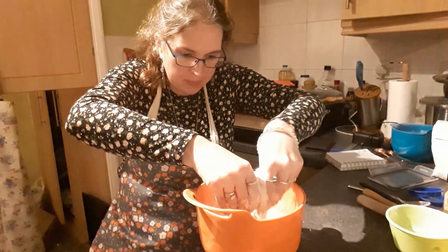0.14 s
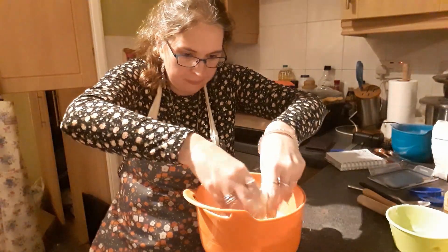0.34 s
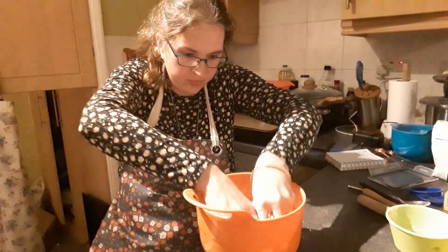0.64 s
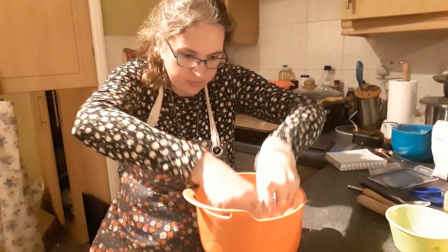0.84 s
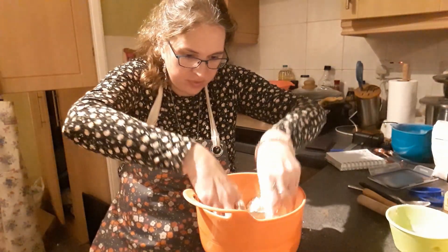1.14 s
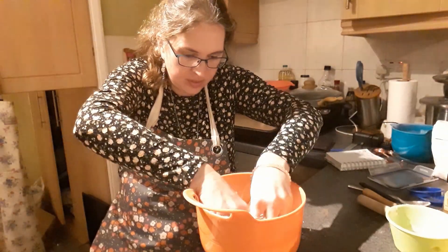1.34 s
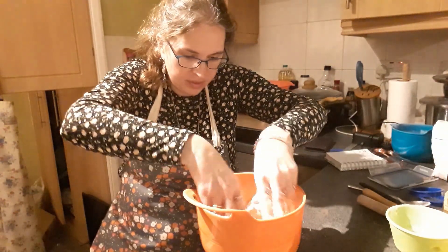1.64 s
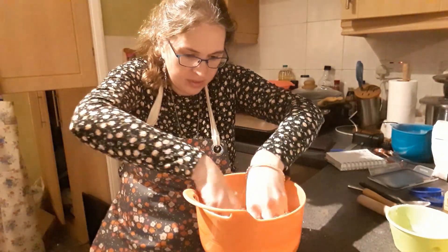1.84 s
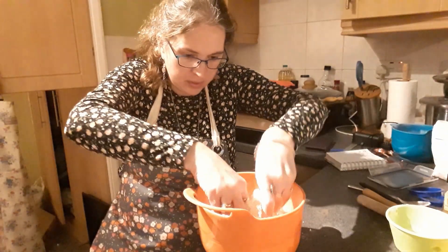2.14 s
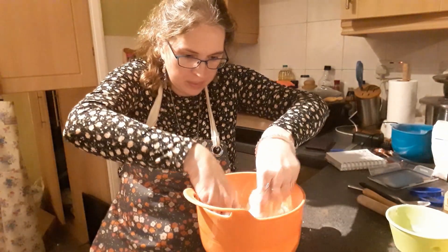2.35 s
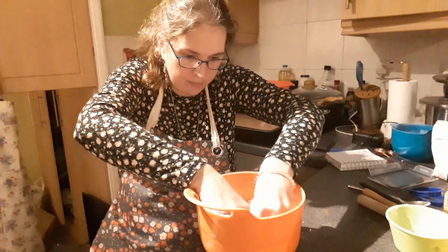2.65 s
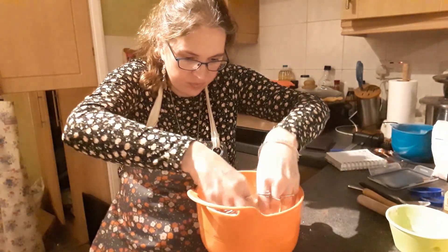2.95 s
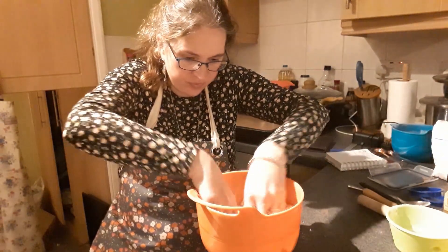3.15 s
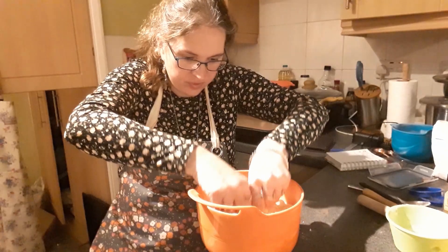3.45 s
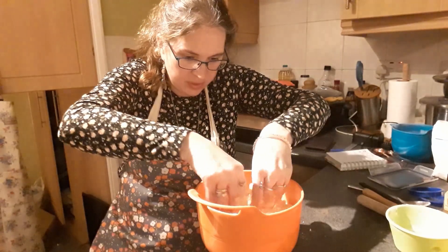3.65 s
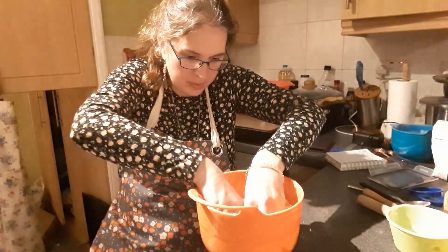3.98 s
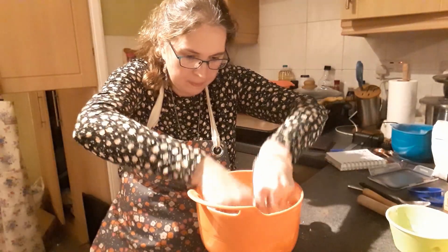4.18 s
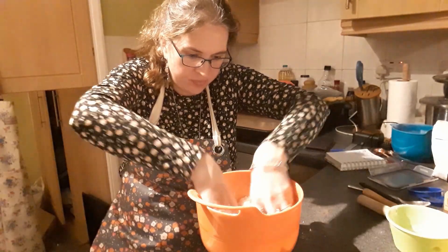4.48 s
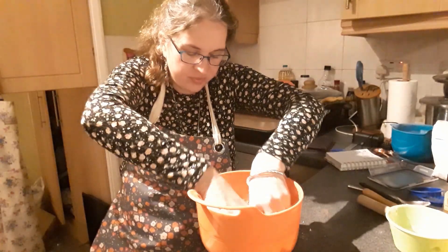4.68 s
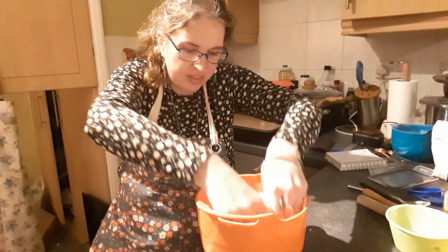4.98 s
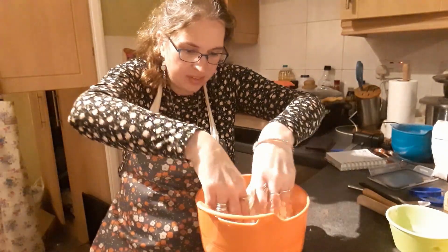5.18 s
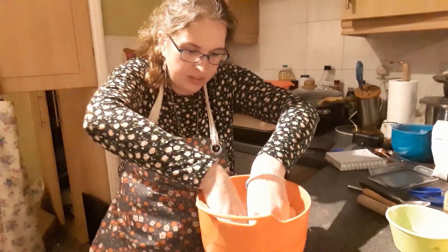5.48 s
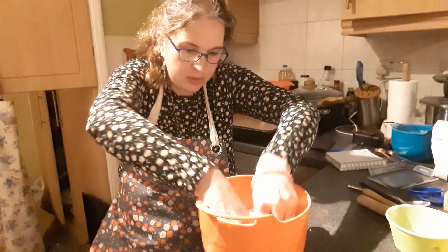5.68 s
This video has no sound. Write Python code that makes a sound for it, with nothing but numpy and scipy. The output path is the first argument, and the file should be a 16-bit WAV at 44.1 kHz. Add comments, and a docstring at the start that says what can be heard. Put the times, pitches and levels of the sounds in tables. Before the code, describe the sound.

Irregular clacks of ringed hands against a plastic mixing bowl punctuate soft floury rubbing and a steady appliance hum.

```python
"""Two hands rub butter into flour in a plastic mixing bowl, heard in mono from beside a kitchen worktop.
Flour hisses between the fingers, fingertips scrape the wall, and two thin squeaks come near the end.
Knuckles nudge the bowl, ringed hands knock on it and set it rocking, and the rings tick lightly.
The small hard room answers every knock; behind it all an appliance hums at twice the mains rate."""
import sys
import numpy as np
from scipy import signal
from scipy.fft import rfft, irfft
from scipy.io import wavfile

SR = 44100
rng = np.random.default_rng(int(sys.argv[2]) if len(sys.argv) > 2 else 0)


def dump_mix(stems):
    """Bounce the given channels to the path in sys.argv[1] as a 16-bit WAV at rate SR."""
    frames = np.atleast_2d(stems).T  # one column per channel
    limited = np.clip(frames, -1, 1)  # hard clip at full scale
    pcm = np.round(limited * 32767).astype(np.int16)
    wavfile.write(sys.argv[1], SR, pcm)


N = 256662
TIME = np.arange(N) / SR


def from_db(db):
    """Decibels to gain."""
    return 10 ** (np.asarray(db) / 20)


def rms_one(x):
    """Scale to rms 1."""
    return x / np.sqrt(np.mean(x ** 2) + 1e-30)


def unit_energy(x):
    """Scale a response so that it passes white noise at unchanged level."""
    return x / np.sqrt(np.sum(x ** 2) + 1e-30)


def at_hz(points, hz):
    """Read a curve on a log-frequency axis."""
    points = np.array(points)
    return np.interp(np.log(np.maximum(hz, 1)), np.log(points[:, 0]), points[:, 1])


def through(x, response):
    """Pass a signal through an impulse response."""
    return signal.fftconvolve(x, response)[:len(x)]


def resonance(x, hz, q):
    """The part of a signal that one resonance passes."""
    return signal.lfilter(*signal.iirpeak(hz, q, fs=SR), x)


def pulse(spectrum, size=4096):
    """The shortest causal pulse with this spectral shape, given as (Hz, dB) points."""
    gains = from_db(at_hz(spectrum, np.arange(size // 2 + 1) * SR / size))
    cepstrum = irfft(np.log(gains))
    cepstrum[1:size // 2] *= 2   # fold to minimum phase
    cepstrum[size // 2 + 1:] = 0
    return unit_energy(irfft(np.exp(rfft(cepstrum))))


def ringing(modes):
    """Decaying sines of alternating sign; dB sets each one's share of the energy."""
    t = TIME[:SR // 2]
    out = np.zeros(len(t))
    for k, (hz, db, t60) in enumerate(modes):
        mode = np.sin(2 * np.pi * hz * t) * np.exp(-np.log(1000) * t / t60)
        out += (-1) ** k * from_db(db) * unit_energy(mode)
    return unit_energy(out)


def drift(per_s):
    """A random wander of rms 1 that turns per_s times a second."""
    knots = rng.standard_normal(4096)
    return rms_one(np.interp(TIME * per_s, np.arange(len(knots)), knots))


def add(out, start_s, x):
    """Mix a sound in at its start time."""
    at = max(round(start_s * SR), 0)
    out[at:at + len(x)] += x[:max(N - at, 0)]


# The rush of the room all round the microphone. Each row: frequency in Hz, relative level in dB.
AIR_SPECTRUM = [(20, -20.5), (60, -2.5), (130, -4.5), (165, 2.5), (235, -5), (330, -7.5), (400, -13.5),
                (520, -10), (800, -18.5), (1400, -31), (5000, -42), (7500, -24), (9000, -38.5),
                (16000, -30.5)]
# The hum in the background. Each row: multiple of the hum rate, rms level in dB.
HUM_PARTIALS = [(1, -49.5), (2, -71), (3, -69)]
# The whirr that goes with it. Each row: centre in Hz, width in Hz, rms level in dB.
WHIRR_BANDS = [(228.2, 7.8, -70), (2820, 170, -83)]

def appliance(hum_hz, air_db):
    """Mains hum, a narrow whirr and the soft rush of the room."""
    out = from_db(air_db) * through(rng.standard_normal(N), pulse(AIR_SPECTRUM))
    for multiple, db in HUM_PARTIALS:
        amplitude = np.sqrt(2) * from_db(db + 0.054 * multiple * drift(5.1))
        out += amplitude * np.sin(2 * np.pi * (multiple * hum_hz * TIME + rng.random()))
    for hz, width, db in WHIRR_BANDS:
        out += from_db(db) * rms_one(resonance(rng.standard_normal(N), hz, hz / width))
    return out


# The small hard kitchen, heard from the worktop. Each row: frequency in Hz, 60 dB decay in seconds.
ROOM_DECAY = [(150, 0.51), (500, 0.27), (2500, 0.29), (7000, 0.26), (14000, 0.37)]

def kitchen(x, wet_db, first_s=0.003, build_s=0.00044):
    """Direct sound reaches the microphone, then reflections thicken fast and die octave by octave."""
    t = TIME[:SR // 2]
    build = 1 - np.exp(-np.maximum(t - first_s, 0) / build_s)
    scatter = rfft(rng.standard_normal(len(t)) * build)
    octaves = 125 * 2 ** np.arange(8)
    bin_hz = np.arange(1, len(scatter) + 1) * SR / len(t)
    nearest = np.argmin(abs(np.log(bin_hz / octaves[:, None])), axis=0)
    tail = np.zeros(len(t))
    for k, hz in enumerate(octaves):
        decay = np.exp(-np.log(1000) * t / at_hz(ROOM_DECAY, hz))
        tail += irfft(scatter * (nearest == k), len(t)) * decay
    wet = from_db(wet_db)
    return (x + wet * through(x, unit_energy(tail))) / np.sqrt(1 + wet ** 2)


# The worktop under the bowl. Each row: mode in Hz, relative level in dB, 60 dB decay in seconds.
WORKTOP_MODES = [(75, -11, .06), (163.6, 11, 0.25), (230, -9, 0.058)]
# The dull crunch inside the bowl. Each row: frequency in Hz, relative level in dB.
CRUNCH_SPECTRUM = [(80, -21), (300, -19), (430, 19.5), (560, 19.5), (750, 12), (1100, -17), (1700, -12),
                   (3000, 9), (8000, -48), (16000, -18.5)]
# Knuckles push through the flour. Each row: start in seconds, crunch and thump in relative dB.
KNUCKLE_PUSHES = [(0.872, -72, -66), (1.370, -67.5, -74), (1.952, -63, -59.5), (2.535, -61, -69.5),
                  (2.701, -63.5, -60.5), (4.154, -71, -52), (4.471, -45.5, -46.5), (4.668, -72, -55),
                  (4.800, -62, -64)]

def nudges(rise_s, fall_s, level_db, thump_db):
    """Cushioned pushes: a dull crunch in the bowl and a thump in the worktop."""
    out, t, worktop = np.zeros(N), TIME[:SR // 4], ringing(WORKTOP_MODES)
    for start_s, db, weight_db in KNUCKLE_PUSHES:
        push = rng.standard_normal(len(t)) * (1 - np.exp(-t / rise_s)) * np.exp(-t / fall_s)
        add(out, start_s, from_db(db + level_db) * through(push, pulse(CRUNCH_SPECTRUM)))
        add(out, start_s, from_db(weight_db + thump_db) * worktop)
    return out


def contact(spread_s, smear):
    """Bending waves run round the wall and stretch a touch into a short packet without colouring it."""
    omega = 2 * np.pi * np.arange(1025) / 2048
    spectrum = np.ones(len(omega), complex)
    for share in rng.uniform(.85, 1.15, 5) / 1.6 ** np.arange(5):
        lag = np.exp(-1j * omega * np.ceil(share * spread_s * SR))
        spectrum *= (lag - smear) / (1 - smear * lag)   # all-pass
    return irfft(spectrum)


# A metal ring on the hand. Each row: mode in Hz, relative level in dB, 60 dB decay in seconds.
RING_MODES = [(5000, -3, 0.02), (7510, 5.5, 0.022), (7600, 3.5, 0.012), (11100, -6, 0.0069),
              (13300, 0.5, 0.0067), (13400, -3, 0.0054), (15000, -3, 0.0036)]

def finger_ring(detune=0.018, vary_db=4):
    """The finger inside a ring shifts and weighs its modes anew at each touch."""
    chance = rng.standard_normal((len(RING_MODES), 2))
    return ringing([(hz * (1 + detune * shift), db + vary_db * weight, t60)
                    for (hz, db, t60), (shift, weight) in zip(RING_MODES, chance)])


# Rings touch lightly, down in the bowl. Each row: start in seconds, relative level in dB.
RING_TOUCHES = [(1.69, -57), (1.916, -42.5), (2.117, -57), (2.214, -55.5), (2.295, -54), (2.530, -46.5),
                (2.651, -49.5), (3.309, -46), (4.718, -35), (4.728, -38), (4.743, -37)]

def ring_ticks(level_db, ring_db, bright_hz):
    """Small metal touches: a few short high modes and a click coloured like the top of the flour hiss."""
    out = np.zeros(N)
    highpass = signal.butter(2, bright_hz, "high", fs=SR, output="sos")
    for start_s, db in RING_TOUCHES:
        force = from_db(db + level_db) * contact(spread_s=.0003, smear=.5)
        click = signal.sosfilt(highpass, through(force, pulse(FLOUR_SPECTRUM)))
        add(out, start_s, from_db(ring_db) * through(force, finger_ring()) + click)
    return out


# The bare crack of a blow on plastic. Each row: frequency in Hz, relative level in dB.
CRACK_SPECTRUM = [(60, -9), (160, -16), (215, -5.5), (280, -2.5), (350, -6.5), (480, 1.5), (660, -4.5),
                  (730, -5.5), (850, 3.5), (1200, 0.5), (1370, -3.5), (1650, 0), (2200, 2.5), (4200, 1.5),
                  (5150, -6.5), (5800, -4), (7400, -2.5), (8800, -20), (12500, -8.5), (16000, -24.5)]
# The bowl's resonances. Each row: centre in Hz, width in Hz, lift in dB.
BOWL_RESONANCES = [(415, 14, 4.5), (477, 65, 5), (592, 31, 13.5), (666, 25, 7), (832, 14, 3), (1016, 34, 5),
                   (1225, 11, 9.5), (1518, 59, 7), (1782, 72, 7.5), (2037, 29, 8), (2255, 56, 4),
                   (2488, 49, 8.5), (2690, 88, 3.5), (3064, 37.4, 9.5), (3434, 55, 5.5), (3780, 140, 7),
                   (4220, 43, 7.5), (6830, 30, -4)]

def bowl_wall():
    """The plastic wall colours a crack at each of its resonances."""
    crack = pulse(CRACK_SPECTRUM)
    for hz, width, db in BOWL_RESONANCES:
        crack = crack + (from_db(db) - 1) * resonance(crack, hz, hz / width)
    return unit_energy(crack)


# A ringed hand knocks the bowl; deep knocks reach the microphone more by way of the room.
# Each row: start in seconds, clack in relative dB, then hollow, body and edge in dB against the clack,
# room offset in dB, pitch that the struck spot favours in Hz.
HAND_KNOCKS = [(1.209, -43.5, -5, -13, -10, -3, 2090), (1.777, -22.5, 1.5, 0, 1.5, -0.5, 2100),
               (2.481, -38.5, -32, -4.5, 5, -5.5, 3430), (3.130, -21, -2.5, 0, -0.5, 0.5, 660),
               (3.8641, -25.5, 1.5, -1, 0.5, 4.5, 2070), (4.469, -21, -0.5, 1.5, 4.5, 5, 2760),
               (4.6656, -26.5, -3, 1.5, 2.5, 1.5, 1000), (4.889, -30.5, -0.5, -4, -12, -1.5, 2860),
               (5.341, -23, -7, -7.5, -1, 1.5, 940), (5.663, -46, -3, -8, -25, 4, 2780)]
# The bowl rocks back onto the worktop. Each row: start in seconds, dB against the knock before.
BOWL_REBOUNDS = [(3.135, 3.5), (3.151, 0), (3.867, 2), (3.886, -3), (4.484, -8), (4.502, -4), (4.526, -7.5),
                 (4.734, -10.5)]

def knocks(level_db, ring_db, thump_db, wet_db, spot_db, hollow_hz, body_hz, clack_hz, edge_hz):
    """Knocks sound the bowl, ring and worktop; as the arms move, each touch meets new reflections."""
    rows = np.array(HAND_KNOCKS)
    touches = list(rows)
    for start_s, db in BOWL_REBOUNDS:
        _, knock_db, *colour = rows[np.searchsorted(rows[:, 0], start_s) - 1]
        touches.append((start_s, knock_db + db, *colour))
    out, wall, worktop = np.zeros(N), bowl_wall(), ringing(WORKTOP_MODES)
    for start_s, db, hollow, body, edge, room_db, spot_hz in touches:
        response = from_db(ring_db) * finger_ring()
        add(response, 0, wall + (from_db(spot_db) - 1) * resonance(wall, spot_hz, q=11.2))
        blow = pulse([(hollow_hz, hollow), (body_hz, body), (clack_hz, 0), (edge_hz, edge)])
        blow /= abs(rfft(blow, SR)[int(clack_hz)])   # the clack register keeps its level
        knock = through(through(response, blow), contact(spread_s=.0007, smear=0.759))
        add(out, start_s, from_db(db + level_db) * kitchen(knock, wet_db + room_db))
    for start_s, db in rows[:, :2]:
        add(out, start_s, from_db(db + thump_db) * worktop)
    return out


SWELL_SHARE = 0.81   # squeaks and strokes swell over this share of their length
# Thin squeaks at the bowl. Each row: start and length in seconds, pitch in Hz, relative level in dB.
THIN_SQUEAKS = [(5.153, 0.035, 6050, -60.5), (5.618, 0.027, 5890, -46.5)]

def squeaks(waver_hz, fade_s):
    """Brief, nearly pure tones that swell and stop, wavering a little in pitch."""
    out = np.zeros(N)
    for start_s, length_s, hz, db in THIN_SQUEAKS:
        envelope = np.interp(TIME - start_s, [0, SWELL_SHARE * length_s, length_s + fade_s], [0, 1, 0])
        phase = 2 * np.pi * np.cumsum(hz + waver_hz * drift(300)) / SR
        out += from_db(db) * envelope * np.sin(phase)
    return out


def grains(per_s, spread_db):
    """Countless tiny slips of uneven size; rms 1."""
    slips = (rng.random(N) < per_s / SR) * rng.standard_normal(N)
    sizes = from_db(spread_db * np.minimum(rng.exponential(1, N), 4))
    return rms_one(slips * sizes)


def stroke(start_s, length_s, release_s=0.042):
    """Pressure of one stroke, 0-1: it swells, holds, and dies away when the fingers let go."""
    t = TIME - start_s
    swell = np.clip(t / (SWELL_SHARE * length_s), 0, 1)
    return swell * np.exp(-np.maximum(t - length_s, 0) / release_s)


# Flour hissing between the fingers. Each row: frequency in Hz, relative level in dB.
FLOUR_SPECTRUM = [(200, -33), (1200, -22), (2200, -5.5), (3300, 0), (5000, 0.5), (7500, 3.5), (8600, -11),
                  (10000, -11), (13000, -7), (16000, -15)]
# Fingertips on the inside wall. Each row: frequency in Hz, relative level in dB.
SCRAPE_SPECTRUM = [(100, -16), (350, -20.5), (550, 3.5), (1000, 0.5), (1600, 3), (2400, -3), (4500, -8),
                   (9000, -64), (16000, -31)]
# The hands at work, in front of the microphone.
# Each row: start and length in seconds, sliding flour and wall scrape in relative dB.
FINGER_STROKES = [(0.0, 0.036, -61, -70), (0.222, .15, -65, -79), (0.41, 0.082, -55, -97),
                  (0.511, 0.062, -48, -73), (0.698, 0.14, -69, -72), (0.856, 0.029, -56, -59.5),
                  (0.908, 0.37, -58.5, -78), (1.339, 0.047, -57, -61.5), (1.677, 0.012, -53, -66),
                  (1.73, 0.054, -52, -70), (1.925, 0.029, -54.5, -60.5), (2.283, .14, -53, -71.5),
                  (2.484, 0.058, -51.5, -60.5), (2.637, 0.073, -56, -61.5), (3.075, 0.059, -54.5, -64),
                  (3.332, 0.013, -58.5, -72.5), (3.698, 0.053, -72, -75.5), (3.79, 0.084, -53, -73),
                  (4.113, 0.024, -69, -74), (4.372, 0.087, -51, -71), (4.736, 0.19, -53, -57),
                  (5.223, 0.2, -53.5, -73), (5.477, 0.069, -50.5, -64), (5.646, 0.029, -59, -65)]

def rubbing(flour_db, scrape_db, swish_gain, swish_hz):
    """Flour slides between the fingers; fingertips drag on the wall in tiny uneven slips."""
    sliding, dragging = from_db(-77), from_db(-82)   # faint crumbling goes on between strokes
    for start_s, length_s, sliding_db, wall_db in FINGER_STROKES:
        pressure = stroke(start_s, length_s)
        sliding = np.hypot(sliding, from_db(sliding_db) * pressure)
        dragging = np.hypot(dragging, from_db(wall_db) * pressure)
    sliding *= from_db(flour_db + 2 * drift(78))
    dragging *= from_db(scrape_db + 2 * drift(50))
    hiss = through(sliding * grains(per_s=4700, spread_db=2.0), pulse(FLOUR_SPECTRUM))
    hiss += swish_gain * resonance(hiss, swish_hz, q=5)   # the cupped hands focus the hiss
    scrape = through(dragging * grains(per_s=2800, spread_db=5.0), pulse(SCRAPE_SPECTRUM))
    return hiss + scrape


def scene():
    """One microphone over the hum, at the distance where the hands and their reflections are equal."""
    bowl = knocks(level_db=21.5, ring_db=-19.5, thump_db=2.0, wet_db=5.0, spot_db=7,
                  hollow_hz=610, body_hz=2010, clack_hz=3380, edge_hz=6800)
    pushes = nudges(rise_s=0.0046, fall_s=0.023, level_db=12.5, thump_db=36.5)
    hands = rubbing(flour_db=-1.5, scrape_db=1.5, swish_gain=0.43, swish_hz=3300)
    hands += ring_ticks(level_db=24.0, ring_db=-6.5, bright_hz=7300)
    hands += squeaks(waver_hz=45, fade_s=0.0072)
    foreground = bowl + kitchen(hands, wet_db=0.0) + kitchen(pushes, wet_db=-3.5)
    return (foreground + appliance(hum_hz=100.1, air_db=-63))[None]


def record(dry, cutoff_hz=16100):
    """A steep low-pass cuts the top of the microphone's signal."""
    return signal.sosfilt(signal.ellip(12, .1, 80, cutoff_hz, fs=SR, output="sos"), dry)


dry = scene()
out = record(dry)
dump_mix(out)
```